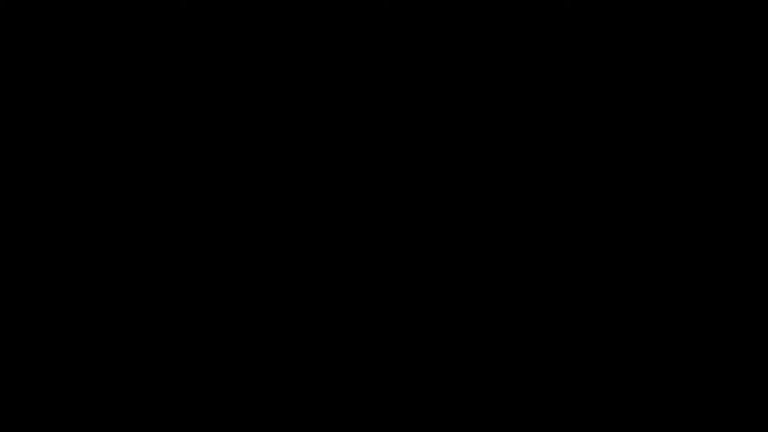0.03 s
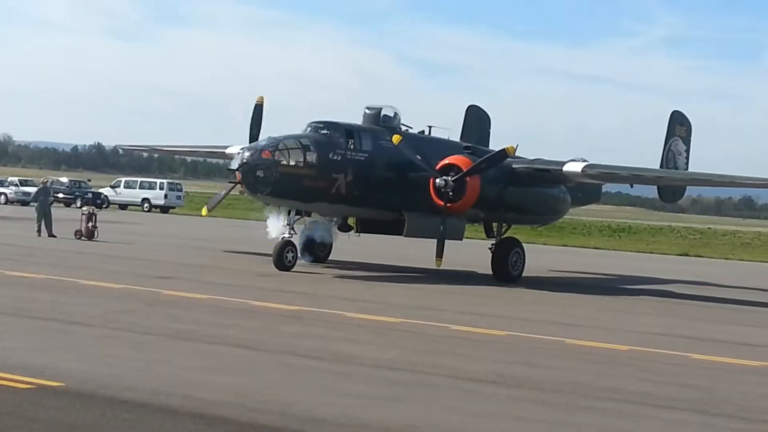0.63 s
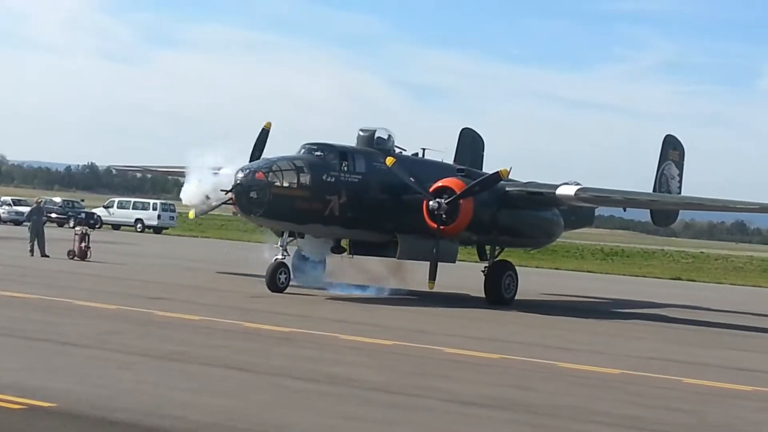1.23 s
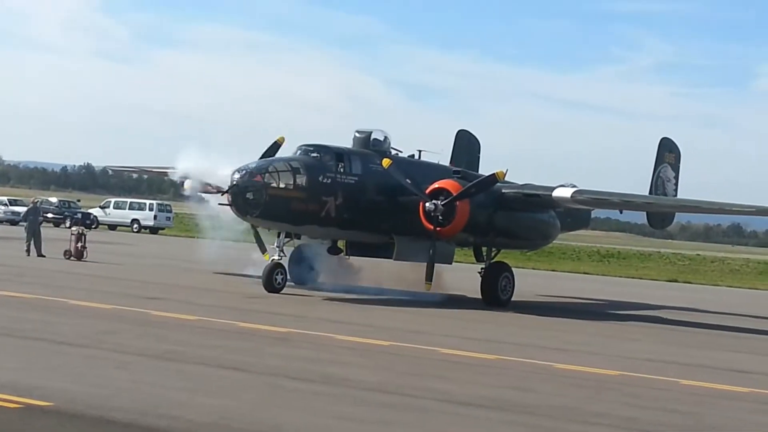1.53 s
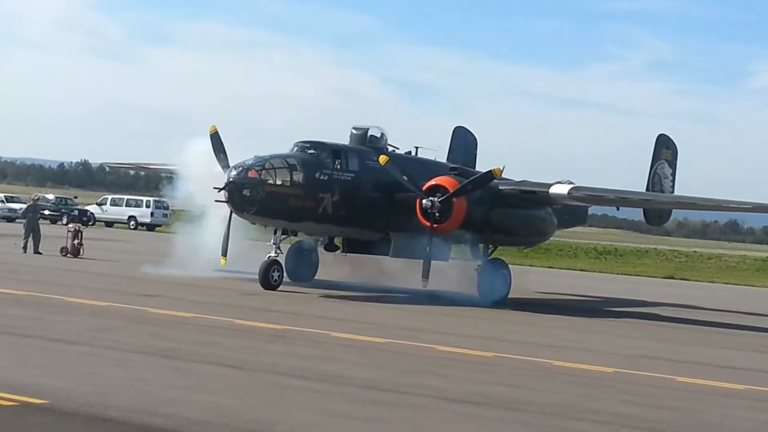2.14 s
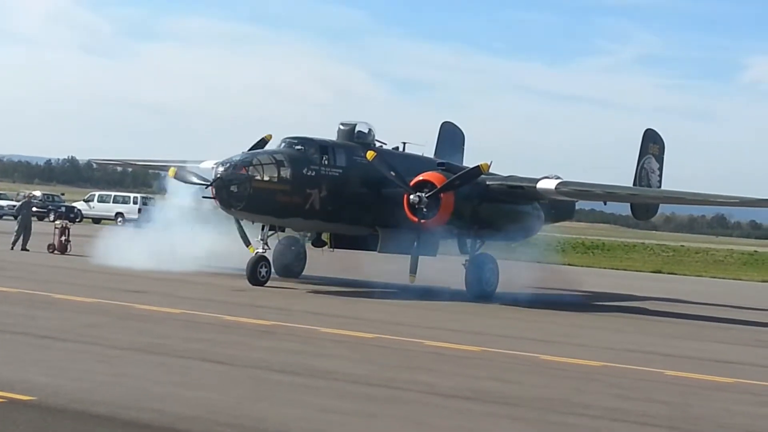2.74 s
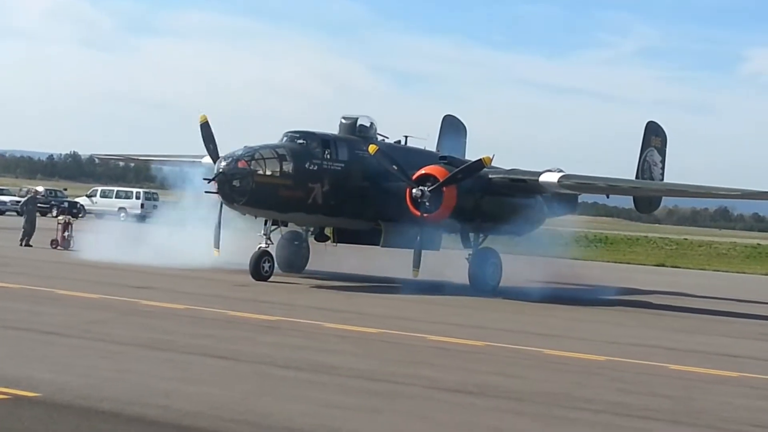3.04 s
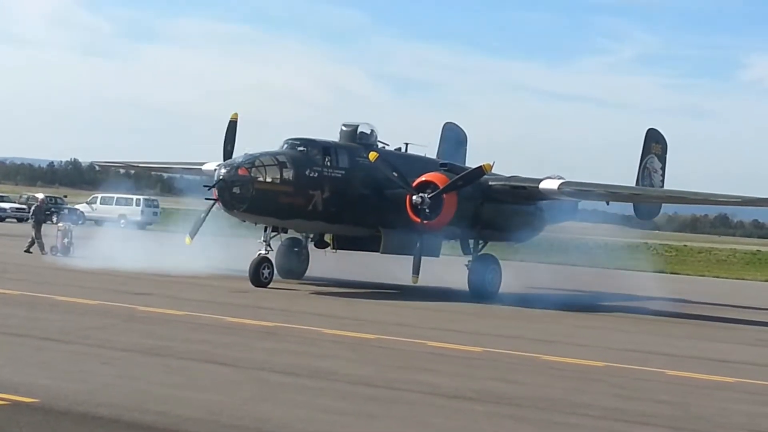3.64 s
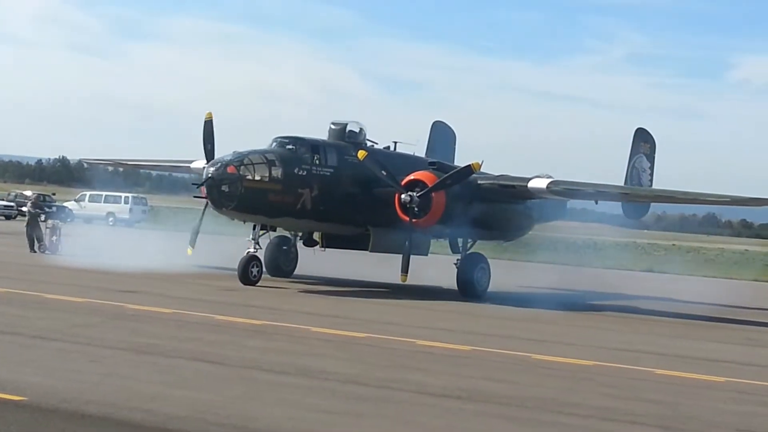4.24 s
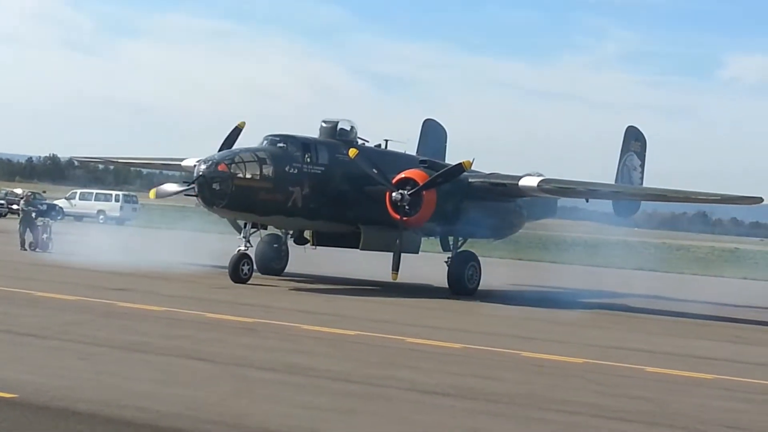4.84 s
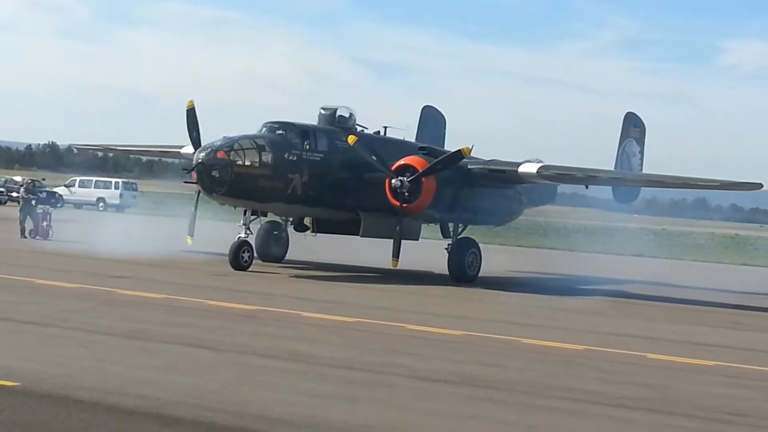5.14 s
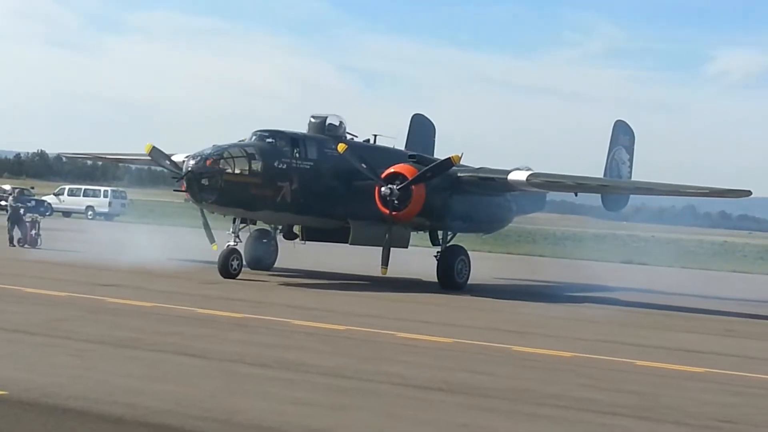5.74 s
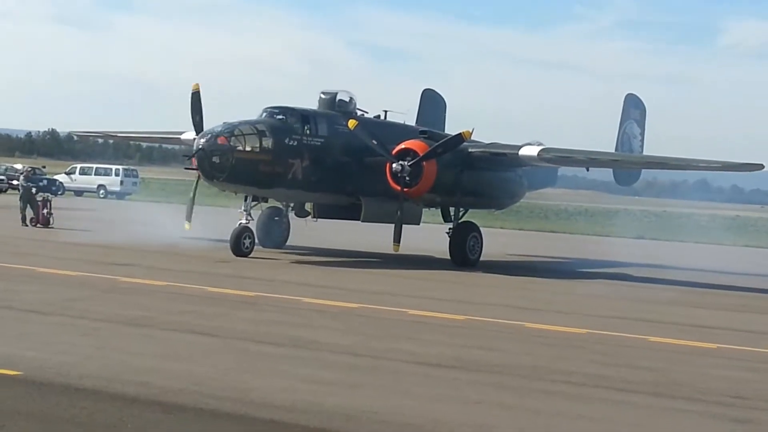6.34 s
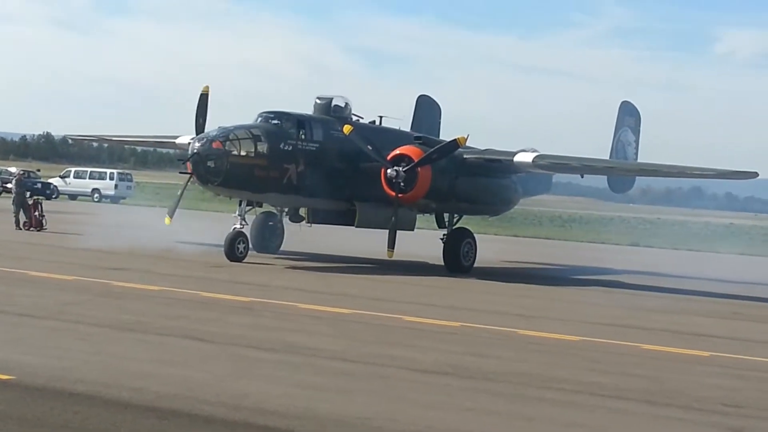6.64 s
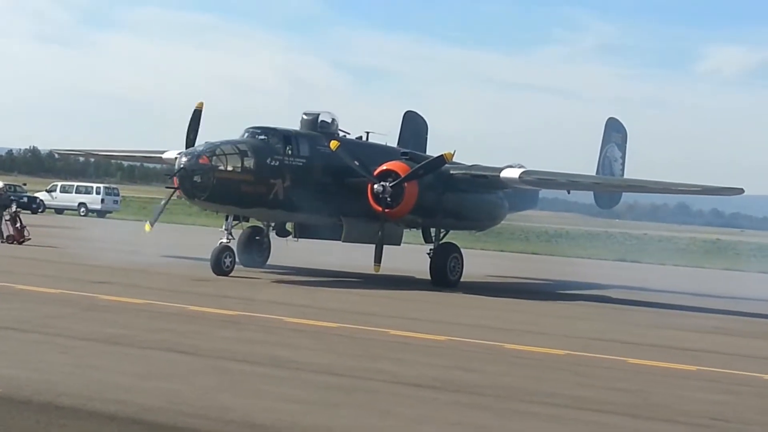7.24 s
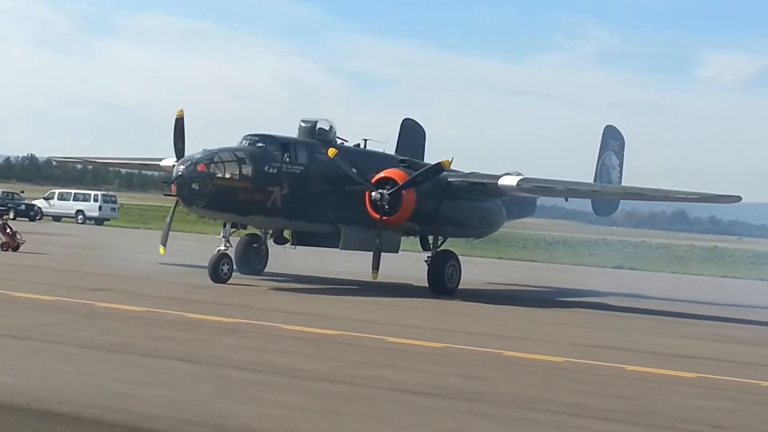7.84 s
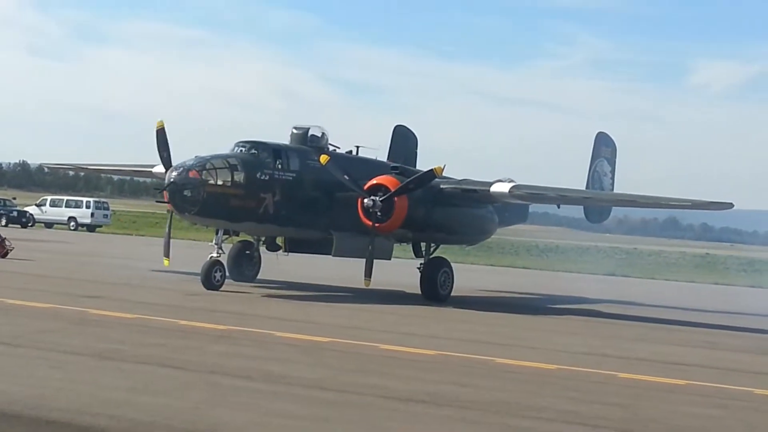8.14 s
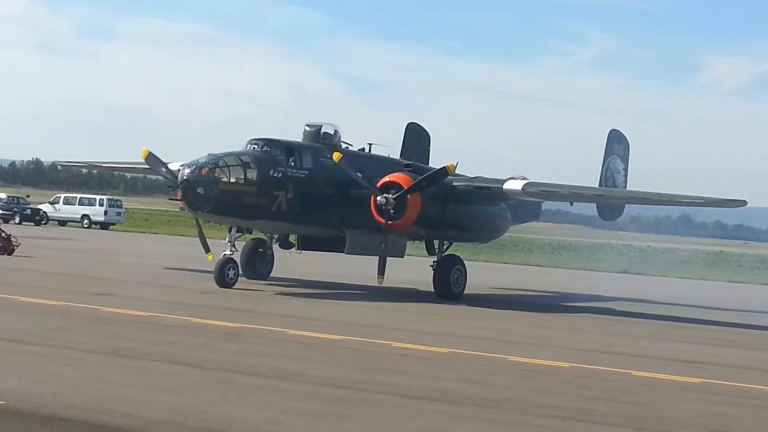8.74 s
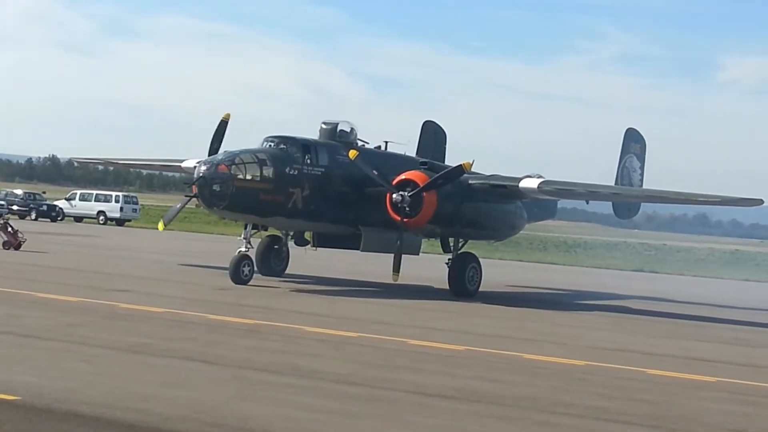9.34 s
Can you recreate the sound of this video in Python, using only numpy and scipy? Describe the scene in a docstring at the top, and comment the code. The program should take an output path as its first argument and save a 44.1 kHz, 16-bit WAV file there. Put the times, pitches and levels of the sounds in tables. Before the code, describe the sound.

On an open airfield apron, close to a stereo microphone pair, a propeller plane's piston engine bursts into life. It sputters and barks unevenly, with puffs of gas, sharp metallic knocks and a short, falling starter whine. The firing grows faster and fuller, though it still skips and the loudest pops distort. A low drone then firms up, and the propeller chops the loud exhaust into a rhythmic chug.

```python
"""Open apron, a stereo pair close to a fourteen-cylinder radial aircraft engine. The sound begins abruptly:
five cylinders light first, popping and chuffing smoke, each firing a thump and a bark of hot gas from a short
open stack. The starter whines down and the valve gear clacks. The other cylinders join as it warms, though some
keep missing; the loudest firings overload the microphones. It runs up to a loud idle, a low drone firms up, and
the three propeller blades chop the exhaust into regular chugs."""
import sys
import numpy as np
from scipy import signal
from scipy.fft import rfft, irfft
from scipy.io import wavfile

SR = 44100
rng = np.random.default_rng(int(sys.argv[2]) if len(sys.argv) > 2 else 0)


def store_pcm(level_fs):
    """Save levels as 16-bit WAV."""
    pcm = np.round(np.clip(level_fs, -1, 1) * 32767).astype(np.int16)
    wavfile.write(sys.argv[1], SR, np.atleast_2d(pcm).T)


N = 418950
TIME = np.arange(N) / SR
CYLINDER_COUNT, START_S = 14, 0.8135

# crank speed: t/s, four-stroke cycle rate/Hz
CRANK_SPEED = [(0.8, 3.44), (1.2, 3.357), (1.9, 4.111), (2.3, 4.733), (3.0, 5.582), (4.2, 6.034),
               (6.0, 6.728), (7.1, 6.862), (7.8, 6.97), (8.5, 7.05), (9.45, 7.2)]
# how hard the engine runs: t/s, exhaust/dB, gas hiss/dB, blow-off puffs/dB
EFFORT = [(0.8, -13.5, -27.5, -36), (1.15, -16, -29.5, -34), (1.3, -15, -22.5, -25), (1.8, -15, -23.5, -23),
          (2.1, -13, -24, -16), (3.0, -12, -21, -20.5), (3.3, -12.5, -22, -17), (5.5, -11, -21.5, -18),
          (7.0, -12, -21, -20.5), (9.5, -11.5, -19.5, -26)]
# spectrum of churning exhaust: f/Hz, level/dB
RUMBLE_SPECTRUM = [(20, -56), (40, -59), (60, -16), (100, 1), (200, 4.5), (290, 3), (420, -11), (800, -8.5),
                   (2000, -56)]
# spectrum of gas rushing past the valves: f/Hz, level/dB
GAS_SPECTRUM = [(40, -32), (150, -12.5), (450, -2.5), (1000, -0.5), (1500, 1), (1820, -3), (2150, -0.5),
                (2450, -7), (2930, -2), (3200, 0.5), (4200, -0.5), (5000, -5.5), (5900, -19), (6600, -11),
                (11000, -18), (13000, -118)]


def amp(db):
    """Decibels to gain."""
    return 10 ** (np.asarray(db) / 20)


def unit(x):
    """Scales to rms 1."""
    return x / np.sqrt(np.mean(x ** 2) + 1e-20)


def curves(rows):
    """Each column of a timed table, sample by sample."""
    times, *columns = np.transpose(rows)
    return [np.interp(TIME, times, column) for column in columns]


def at_hz(points, hz):
    """Reads a table along a log-frequency axis."""
    f, value = np.transpose(points)
    return np.interp(np.log(hz + 1), np.log(f + 1), value)


def clicks(times, sizes):
    """One impulse at each time."""
    return np.bincount(np.clip(np.round(times * SR).astype(int), 0, N), sizes, N + 1)[:N]


def ring(x, response):
    """Convolves and cuts to length."""
    return signal.oaconvolve(x, response)[:N]


def add(mix, at_s, sound):
    """Mixes a sound in at a time."""
    part = mix[:, max(round(at_s * SR), 0):][:, :sound.shape[1]]
    part += sound[:, :part.shape[1]]


def swell(rise_s, fall_s, size=6000):
    """Envelope of one burst, with peak 1."""
    t = TIME[:size]
    shape = (1 - np.exp(-t / rise_s)) * np.exp(-t / fall_s)
    return shape / shape.max()


def wander(hz):
    """Smooth random motion of rms 1, up to about the given rate."""
    f = np.fft.rfftfreq(N, 1 / SR)
    return unit(irfft(rfft(rng.standard_normal(N)) * np.exp(-(f / hz) ** 2), N))


def turbulence(spectrum):
    """Coloured noise at both microphones, less alike towards the treble."""
    # likeness across the pair: f/Hz, left-right correlation
    likeness = [(60, 0.98), (150, 0.99), (300, 0.94), (500, 0.88), (1000, 0.98), (2000, 0.56), (4000, 0.75),
                (8000, -0.2)]
    hz = np.fft.rfftfreq(N, 1 / SR)
    mid, side = rfft(rng.standard_normal((2, N))) * amp(at_hz(spectrum, hz))
    alike = np.clip(at_hz(likeness, hz), -1, 1)
    mid, side = mid * np.sqrt(1 + alike), side * np.sqrt(1 - alike)
    return unit(irfft(np.array([mid + side, mid - side]), N))


def noise_band(hz, width_hz, envelope, alike=0.6):
    """Noise ringing in one resonance under an envelope, at both microphones."""
    size = len(envelope)
    f = np.fft.rfftfreq(size, 1 / SR)
    mid, side = irfft(rfft(rng.standard_normal((2, size))) / (1 + (2 * (f - hz) / width_hz) ** 2), size)
    side = side * np.sqrt((1 - alike) / (1 + alike))
    return unit(np.array([mid + side, mid - side]) * envelope) * np.sqrt(np.mean(envelope ** 2))


def each_cycle(cycles, slots):
    """The times at which the crank passes the given fourteenths of every cycle."""
    angle = (np.arange(int(cycles[-1]) + 1)[:, None] + slots / CYLINDER_COUNT).ravel()
    return np.interp(angle, cycles, TIME, right=2 * TIME[-1])


def firings(cycles, jitter_s=0.00025, lead_s=0.0008, half_warm_s=3, warming_s=0.6):
    """Time, strength and two random draws for each firing; most cylinders are weak while cold."""
    # uneven arrivals from stacks all round the cowling: slot/(cycle/14), level/dB, change while cold/dB
    cylinders = [(0.03, -5.5, 5), (0.5, -7.5, 3), (1.17, -3.5, -2), (1.87, -8.5, -13), (3.2, -2, -9),
                 (4.23, -9, 9), (4.9, -10, -6), (6.13, -4, 0), (7.25, -9, -10), (9.03, -4.5, -7),
                 (9.4, -4, -2), (10.97, -10.5, 0), (12.23, -2.5, -1.5), (13.4, -8.5, -12)]
    slot, warm_db, cold_db = np.transpose(cylinders)
    times = each_cycle(cycles, slot)
    late, thump_luck, bark_luck = rng.standard_normal((len(times), 3)).T
    cold = 1 / (1 + np.exp((times - half_warm_s) / warming_s))
    strength_db = np.resize(warm_db, len(times)) + cold * np.resize(cold_db, len(times))
    return times + jitter_s * late - lead_s, strength_db, thump_luck, bark_luck


def stack_thump(size=4096):
    """The minimum-phase pressure pulse of one exhaust stack, with peak 1."""
    # response of the open stack: f/Hz, level/dB
    stack_spectrum = [(25, -58), (45, -14.5), (62, -15.5), (100, -12), (160, -3.5), (240, 2.5), (310, -1.5),
                      (410, -15.5), (520, -21.5), (700, -20), (1100, -26), (2500, -33.5), (8000, -62)]
    log_gain = np.log(amp(at_hz(stack_spectrum, abs(np.fft.fftfreq(size, 1 / SR)))))
    pulse = np.fft.ifft(np.exp(np.conj(signal.hilbert(log_gain)))).real[:size // 2]
    return -pulse / abs(pulse).max()


def exhaust(cycles, miss_db, thump_db=9.5, uneven_db=3.5, bark_db=-5, bark_spread_db=2.5,
            bark_follow=0.45, hollow_db=-17, hollow_fade_db_per_s=-1.0, miss_share=0.34):
    """Every firing thumps its stack, rings the hollow nacelle and barks; churning gas rumbles beneath."""
    # the firings gain force as the engine warms: t/s, thump/dB, bark/dB, rumble/dB
    warmth = [(0.8, -12, -3, -7.5), (1.6, -7.5, -10, -7.5), (2.8, -6, -6.5, -6.5), (3.2, -1.5, -1, -7),
              (5.0, -3.5, -3.5, -6.5), (7.0, -1, 0.5, -7.5), (9.5, -1.7, -0.5, -7)]
    # hollow modes of the nacelle: f/Hz, level/dB
    nacelle_modes = [(205, -17), (268, -6.5)]
    # hot gas leaving a stack: f/Hz, level/dB
    bark_spectrum = [(40, -45), (150, -7), (400, 1.5), (560, -4), (720, 2), (980, -6), (1300, -8.5),
                     (1800, -4.5), (2600, -8), (6000, -22.5), (14000, -75)]
    effort_db = curves(EFFORT)[0]
    firing_db = effort_db + miss_share * miss_db
    warm_thump_db, warm_bark_db, rumble_db = curves(warmth)
    times, strength_db, thump_luck, bark_luck = firings(cycles)
    pushes = clicks(times, amp(strength_db + uneven_db * np.minimum(thump_luck, 1.5)))
    pushes *= amp(firing_db + warm_thump_db + thump_db)
    thumps = ring(pushes, stack_thump())
    modes = sum(amp(db) * np.sin(2 * np.pi * hz * TIME[:6000]) for hz, db in nacelle_modes)
    nacelle_pushes = pushes * amp(hollow_db - warm_thump_db + hollow_fade_db_per_s * TIME)
    hollow = ring(nacelle_pushes, swell(0.0011, 0.013) * modes)
    bursts = clicks(times, amp(bark_follow * strength_db + bark_spread_db * np.minimum(bark_luck, 1)))
    bark_envelope = np.sqrt(abs(ring(bursts ** 2, swell(0.0004, 0.013) ** 2)))  # bursts add in power
    barks = bark_envelope * amp(firing_db + warm_bark_db + bark_db) * turbulence(bark_spectrum)
    rumble = amp(effort_db + rumble_db) * turbulence(RUMBLE_SPECTRUM)
    return thumps + hollow + barks + rumble


def gas_hiss(miss_db, rush_db=-1.0, clatter_db=-3.5, flutter_db=2.0, flutter_hz=110, miss_share=0.49):
    """Gas rushes past clattering valves and sags at each miss; a thin sizzle comes and goes on top."""
    # the sizzle against the hiss: t/s, level/dB
    sizzle_level = [(0.8, -8), (2.5, -3), (5.2, -15.5), (6.1, 1.5), (7.2, -26), (9.5, -12)]
    # its spectrum: f/Hz, level/dB
    sizzle_spectrum = [(3000, -30), (4800, -30), (5800, 5), (6700, -1.5), (8500, 1), (11000, -8.5),
                       (14500, 11.5)]
    hiss_db = curves(EFFORT)[1] + miss_share * miss_db
    rush = amp(rush_db) * turbulence(GAS_SPECTRUM)
    sizzle = amp(curves(sizzle_level)[0]) * turbulence(sizzle_spectrum)
    flutter = amp(flutter_db * wander(flutter_hz))
    return amp(hiss_db) * (flutter * (rush + sizzle) + amp(clatter_db) * clatter())


def clatter(ring_s=0.007, width_hz=330, spread_db=2.2, count=1300):
    """Valves and stacks give short knocks at random, each at a pitch of its own."""
    knocks, envelope = np.zeros((2, N)), swell(0.0029, ring_s, size=2048)
    for when, pitch, luck in rng.random((count, 3)):
        hz = 1100 + 3900 * pitch
        knock_db = at_hz(GAS_SPECTRUM, hz) + spread_db * min(-np.log(1 - luck), 3)
        add(knocks, when * TIME[-1], amp(knock_db) * noise_band(hz, width_hz, envelope))
    return unit(knocks)


def blow_off(cycles, miss_db, level_db=-1.5, uneven_db=5.5, rise_s=0.0084, fall_s=0.016,
             tail_db=-13, tail_s=0.082, shrill_db=-5, flicker_db=3.5):
    """The same valves puff shrill gas each cycle unless they miss; the puffs trail off over the apron."""
    # the five cylinders that blow off loudly: slot/(cycle/14), level/dB
    loud_cylinders = [(1.45, -0.5), (3.8, -9.5), (6.7, -4.5), (9.7, 0.5), (12.2, -3)]
    slot, strength_db = np.transpose(loud_cylinders)
    times = each_cycle(cycles, slot)
    luck = np.minimum(rng.standard_normal(len(times)), 1)
    sizes = amp(np.resize(strength_db, len(times)) + uneven_db * luck)
    puffs = clicks(times, sizes) * amp(curves(EFFORT)[2] + miss_db + level_db) * (TIME > START_S)
    shape = swell(rise_s, fall_s, size=10000) + amp(tail_db) * swell(rise_s, tail_s, size=10000)
    envelope = np.sqrt(abs(ring(puffs ** 2, (shape / shape.max()) ** 2)))
    jet = turbulence(GAS_SPECTRUM) * amp(flicker_db * np.clip(wander(9.9), -1.5, 0.5))
    shrill = amp(shrill_db) * noise_band(hz=3800, width_hz=1000, envelope=np.ones(N))
    return envelope * unit(jet + shrill)


def pops(thump_db=-1, bang_db=-3, bark_db=-7, bark_width_hz=520, open_cycles=0.04, crack_db=0.5,
         boom_db=-14):
    """A rich charge goes off hard: thump, crack and boom, with a bark and bang while the valve is open."""
    # single hard firings: t/s, thump and boom/dB, crack, bark and bang/dB, pitch/Hz
    hard_firings = [(0.826, -20, -27, 750), (0.891, -13, -34, 700), (0.996, -8, -20.5, 794),
                    (1.063, -8, -12, 1137), (1.194, -7, -17, 760), (1.253, -10, -36, 600),
                    (1.292, -6, -31, 732), (1.356, -6.5, -18.5, 1100), (1.417, -12, -33, 750),
                    (1.481, -14, -27, 1350), (1.527, -7, -22, 735), (1.558, -12, -36, 700),
                    (1.571, -20, -20.5, 670), (1.597, -12, -30, 910), (1.633, -12, -15, 1110),
                    (1.742, -12, -33, 900), (1.790, -12, -23, 1100), (1.824, -12, -35, 750),
                    (1.844, -14, -26, 800), (1.876, -8, -18.5, 1190), (1.984, -3.5, -21, 1040),
                    (2.062, -6, -19.5, 676), (2.113, -3, -18.5, 1200), (2.160, -5.5, -23, 750),
                    (2.215, -10, -19, 676), (2.284, -9, -22, 800), (2.373, -5.5, -19, 810),
                    (2.434, -6, -23, 900), (2.492, -5, -27, 750), (2.537, -5.5, -14.5, 820),
                    (2.578, -9, -33, 700), (2.658, -6, -33, 750), (2.686, -4.5, -18, 770),
                    (2.730, -5, -16, 870), (2.770, -7, -26, 750), (2.823, -9, -18, 746),
                    (2.845, -7, -31, 700), (2.876, -8, -25, 800), (2.998, -3.5, -16, 1230),
                    (3.102, -19, -21, 910), (3.275, -12, -15, 1090), (3.352, -5.5, -13.5, 1170),
                    (3.450, -6.5, -15, 990), (3.602, -13, -13.5, 1160), (3.699, -9, -11.5, 740),
                    (3.751, -14, -20, 1110), (4.889, 0, -12.5, 640), (5.019, -16, -16, 685),
                    (5.057, -3, -23, 778), (5.100, -18, -20, 910), (5.215, -28, -14, 750),
                    (5.324, -13, -15.5, 910), (5.628, -5, -16, 670), (6.116, -6, -17, 820),
                    (6.16, -2, -20, 720), (6.290, -5, -12, 660), (6.421, -10, -17, 700),
                    (6.726, -8, -16, 620), (6.902, -14, -18, 654), (7.637, -4, -16, 640),
                    (7.846, -4, -13.5, 740), (8.144, -18, -16, 676), (8.229, -19, -14.5, 756),
                    (8.905, -2, -23, 670), (8.986, 0, -17, 767), (9.068, -1.5, -15, 610)]
    # the broad bang of the charge: f/Hz, level/dB
    bang_spectrum = [(40, -35), (150, -6), (450, -4), (750, -2), (1150, 9), (1500, 1), (2100, -7),
                     (3000, -2), (6000, -31), (10000, -48), (13000, -80)]
    times, push_db, gas_db, pitch_hz = np.transpose(hard_firings)
    speeds = np.interp(times, *np.transpose(CRANK_SPEED))
    barks, bang_envelope = np.zeros((2, N)), np.zeros((2, N))
    front = swell(0.002, 0.0043)  # the pressure front rings the stack for a few periods
    for at, db, hz, speed in zip(times, gas_db, pitch_hz, speeds):
        open_s = open_cycles / speed
        crack = amp(crack_db) * front * np.sin(2 * np.pi * hz * TIME[:len(front)])
        bark = amp(bark_db) * noise_band(hz, bark_width_hz, swell(0.0032, open_s), alike=0.8)
        add(barks, at, amp(db) * (crack + bark))
        add(bang_envelope, at, amp(db + bang_db) * swell(0.0066, open_s)[None])
    pushes = clicks(times, amp(push_db))
    thumps = amp(thump_db) * ring(pushes, stack_thump())
    booms = amp(boom_db) * ring(pushes, swell(0.0045, 0.024)) * turbulence(RUMBLE_SPECTRUM)
    return thumps + booms + barks + bang_envelope * turbulence(bang_spectrum)


def chuffs(rise_s=0.0083, tail_db=-18, tail_s=0.02, spit_width_hz=600, spit_s=0.0083):
    """Cylinders that barely light cough out smoke with a shrill spit, trailing off over the apron."""
    # puffs of half-burnt mixture: t/s, peak/dB, fade/s, spit pitch/Hz, spit against puff/dB
    smoke_puffs = [(0.835, -18.5, 0.021, 3900, -8), (1.003, -23.5, 0.026, 3500, -3),
                   (1.029, -26, 0.01, 4190, 8.5), (1.075, -16.5, 0.033, 3800, -2),
                   (1.194, -14, 0.022, 3450, -8), (1.256, -16.5, 0.011, 3970, 4.5),
                   (1.322, -16.5, 0.011, 3600, -4), (1.42, -21, 0.019, 3700, -9),
                   (1.487, -16.5, 0.02, 3620, -4), (1.601, -15, 0.016, 3770, 4),
                   (1.69, -23, 0.013, 3500, -5), (1.748, -22, 0.018, 4150, 1), (1.789, -21, 0.012, 4140, 3),
                   (1.848, -15.5, 0.012, 3780, 0.5), (1.89, -24, 0.014, 3700, 1),
                   (1.992, -16, 0.018, 3900, -5), (2.036, -18.5, 0.011, 4020, 4.5),
                   (2.088, -18, 0.013, 3700, -3), (2.21, -18, 0.023, 3900, -5),
                   (2.258, -22, 0.012, 4150, 3), (2.309, -20, 0.011, 3700, 5),
                   (2.379, -20, 0.0089, 3900, 0), (2.467, -22, 0.0089, 4400, 2),
                   (2.516, -21, 0.01, 3720, 0), (2.56, -23.5, 0.024, 3900, 5),
                   (2.704, -16.5, 0.0083, 3740, 5), (2.817, -15, 0.013, 3520, -5),
                   (2.894, -21, 0.01, 3720, 0), (3.034, -22.5, 0.008, 4070, 2),
                   (3.073, -18.5, 0.011, 3480, 2), (3.6, -30, 0.009, 3700, -1),
                   (3.9, -19.5, 0.014, 3800, -3), (4.879, -18, 0.024, 3630, 1)]
    spits, power = np.zeros((2, N)), np.zeros((1, N))
    for at, db, fall_s, hz, spit_db in smoke_puffs:
        puff = swell(rise_s, fall_s) + amp(tail_db) * swell(rise_s, tail_s)
        add(power, at, (amp(db) * puff[None] / puff.max()) ** 2)
        add(spits, at, amp(db + spit_db) * noise_band(hz, spit_width_hz, swell(0.0037, spit_s)))
    return spits + np.sqrt(power) * turbulence(GAS_SPECTRUM)


def misfires(cycles, reach_cycles=0.15):
    """Dip in dB while the crank passes a cylinder that does not light."""
    # failed firings: t/s, dip/dB
    misses = [(0.915, -8), (0.965, -4), (1.14, -15), (1.55, -8), (2.63, -11), (3.18, -9), (3.528, -11.5),
              (3.872, -16), (4.695, -9), (4.85, -9), (5.175, -5), (5.79, -5)]
    return sum(db / (1 + ((cycles - np.interp(at, TIME, cycles)) / reach_cycles) ** 8)
               for at, db in misses)


def starter(waver=0.025):
    """The starter's gears give a rough, falling whine once the engine runs by itself."""
    # the gears running down: t/s, f/Hz, level/dB
    run_down = [(1.55, 1263, -58), (1.7, 1192, -25), (2.0, 1062, -29), (2.3, 954, -55)]
    hz, db = curves(run_down)
    turns = np.cumsum(hz * (1 + waver * wander(86))) / SR
    spinning = (TIME > run_down[0][0]) * (TIME < run_down[-1][0])
    return amp(db) * wander(70) * np.sin(2 * np.pi * turns) * spinning


def clacks(level_db=-2, width_hz=800, ring_s=0.0041, edge_db=-5):
    """Valve gear and stacks knock hard: a broad, sudden edge and a short metallic ring."""
    # sharp knocks of metal: t/s, level/dB, f/Hz
    knocks = [(1.603, -16, 3710), (1.986, -11.5, 3500), (2.034, -13, 4020), (2.306, -16, 4080),
              (2.509, -9, 3550), (2.667, -7.5, 3900), (2.852, -6, 4210), (3.255, -15, 3760),
              (3.429, -12, 3630), (3.775, -9.5, 3670), (4.279, -12, 3200), (4.595, -25, 3680),
              (5.39, -9, 3300), (5.994, -8.5, 3570), (6.103, -10, 3750), (6.145, -9, 3190),
              (6.545, -10, 3620), (6.696, -16, 3600), (8.01, -11, 3670)]
    rings, envelope = np.zeros((2, N)), swell(0.0004, ring_s)
    for at, db, hz in knocks:
        add(rings, at, amp(db) * noise_band(hz, width_hz, envelope))
    times, knock_db, _ = np.transpose(knocks)
    edges = ring(clicks(times, amp(knock_db + edge_db)), envelope) * turbulence(GAS_SPECTRUM)
    return amp(level_db) * (rings + edges)


def drone(cycles, waver_db=3.0):
    """The firing order repeats, which gives a few clean low tones."""
    # exhaust tones: multiple of the cycle rate, level/dB
    harmonics = [(9, -21.5), (14, -23), (23, -12.5), (33, -17.5)]
    # the drone firms up as the firing evens out: t/s, level/dB
    firming = [(0.8, -26), (4.7, -34), (5.6, -2.5), (8, 5)]
    tones = sum(amp(db + waver_db * wander(3.6)) * np.sin(2 * np.pi * k * cycles) for k, db in harmonics)
    return tones * amp(curves(EFFORT)[0] + curves(firming)[0])


def propeller(x, cycles, blades=3, turns_per_cycle=1.125, flash_db=9.0, between_db=-1.5, shade_db=-7.0,
              full_speed_hz=8.0):
    """Each blade throws the exhaust at the microphones, then shades it; the chop deepens with speed."""
    # how much of the sound the blades chop: f/Hz, share
    chopped_share = [(100, 0.08), (170, 0.35), (260, 0.48), (450, 0.57), (580, 1), (850, 0.82),
                     (1100, 0.12), (1600, 0.023)]
    flash_at, shade_lag, width = 0.45, 0.38, 0.15  # fractions of one blade's passage
    passage = blades * turns_per_cycle * cycles - flash_at
    flash, shade = (np.exp(-(((passage - lag + 0.5) % 1 - 0.5) / width) ** 2) for lag in (0, shade_lag))
    depth = np.minimum(curves(CRANK_SPEED)[0] / full_speed_hz, 1) ** 5.3
    chop_db = depth * (between_db + flash_db * flash + shade_db * shade)
    chopped = irfft(rfft(x) * at_hz(chopped_share, np.fft.rfftfreq(N, 1 / SR)), N)
    return x + chopped * (amp(chop_db) - 1)


def cowling_and_ground(x):
    """Fixed peaks and notches on the way from the stacks to the microphones."""
    # cowling resonances and ground-bounce notches: f/Hz, width/Hz, gain/dB
    bands = [(365.4, 22, 4), (409, 24, -1), (680, 356, 3.5), (1796, 74, -6), (2100, 280, 0.5),
             (2395, 170, -5), (2925, 113, -12.5), (3300, 200, 1), (3880, 280, -4), (4310, 210, 1),
             (4690, 150, -6), (5280, 350, 3.5), (6730, 1150, 2.5)]
    f = np.fft.rfftfreq(N, 1 / SR)
    colour_db = sum(db / (1 + (2 * (f - hz) / width) ** 2) for hz, width, db in bands)
    return irfft(rfft(x) * amp(colour_db), N)


def scene(crank_start_cycles=-0.404, skip_s=0.02, onset_s=0.00076):
    """The engine as it reaches the pair: an abrupt start, then the crank's beat under pops and clacks."""
    # the beat skips twice: t/s, shift/cycles
    skips = [(7.3, -0.0435), (9.25, 0.087)]
    steady = crank_start_cycles + np.cumsum(curves(CRANK_SPEED)[0]) / SR
    cycles = steady + sum(shift * np.clip((TIME - at) / skip_s, 0, 1) for at, shift in skips)
    miss_db = misfires(cycles)
    running = exhaust(cycles, miss_db) + drone(steady) + gas_hiss(miss_db) + blow_off(cycles, miss_db)
    engine = propeller(running, cycles) + pops() + chuffs() + clacks() + starter()
    return cowling_and_ground(engine) * np.clip((TIME - START_S) / onset_s, 0, 1)


def record(dry, low_cut_hz=46, high_cut_hz=11500, edge_hz=14700):
    """The left microphone hears more treble; both cut deep bass, overload on peaks and dull the top."""
    # balance of the pair: f/Hz, left minus right/dB
    balance = [(60, 1), (130, 0.3), (290, 0.6), (640, 0), (1410, 5.7), (3100, 4.5), (6820, 0), (15000, 16)]
    lean_db = at_hz(balance, np.fft.rfftfreq(2 * N, 1 / SR))
    heard = irfft(rfft(dry, 2 * N) * amp(np.array([lean_db, -lean_db]) / 2))[:, :N]
    heard = signal.sosfilt(signal.butter(4, low_cut_hz, "highpass", fs=SR, output="sos"), heard)
    clipped = heard / (1 + heard ** 12) ** (1 / 12)
    dulled = signal.sosfilt(signal.butter(6, high_cut_hz, fs=SR, output="sos"), clipped)
    steep_low_pass = signal.firwin(511, edge_hz, window=("kaiser", 9), fs=SR)
    return signal.oaconvolve(dulled, steep_low_pass[None], "same")


dry = scene()
out = record(dry)
store_pcm(out)
```